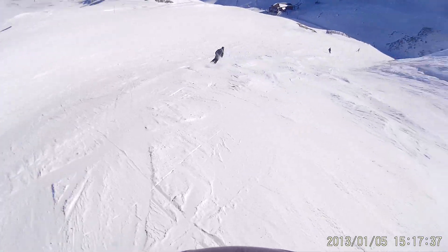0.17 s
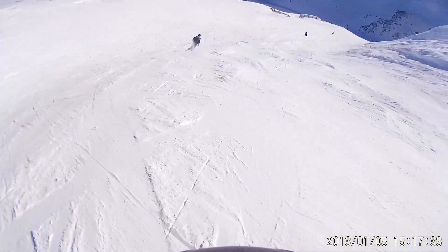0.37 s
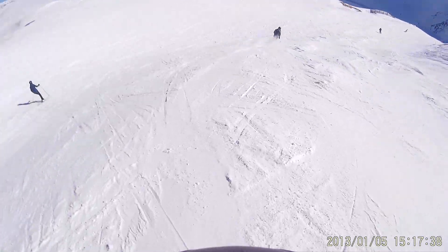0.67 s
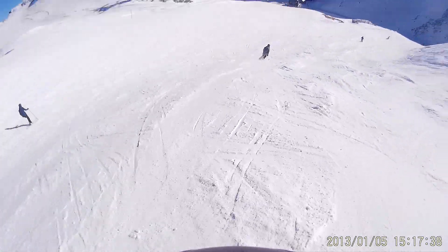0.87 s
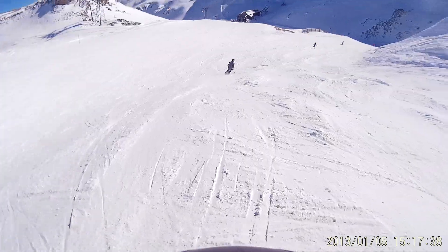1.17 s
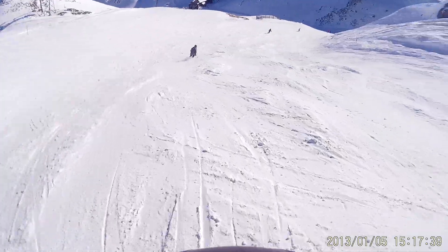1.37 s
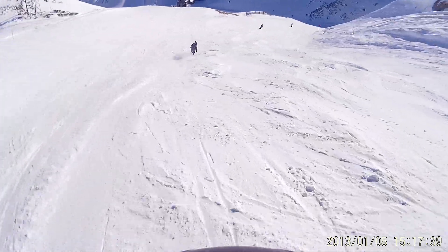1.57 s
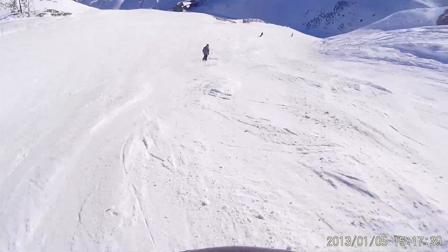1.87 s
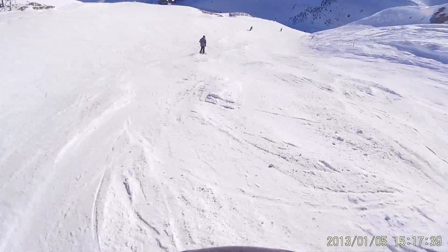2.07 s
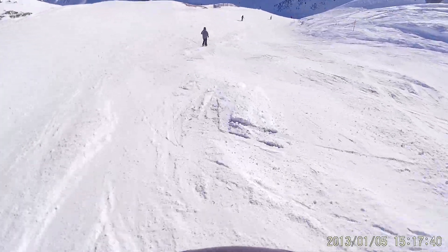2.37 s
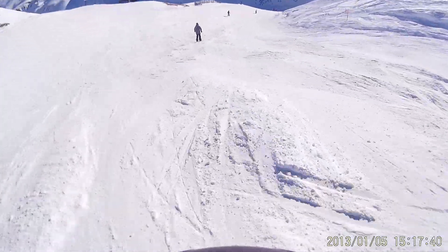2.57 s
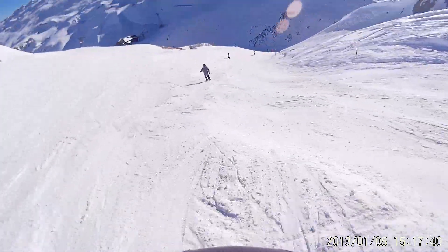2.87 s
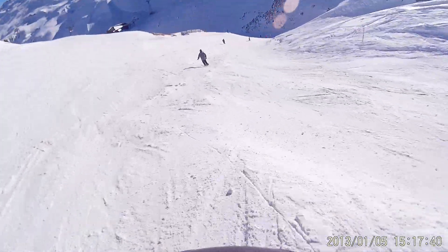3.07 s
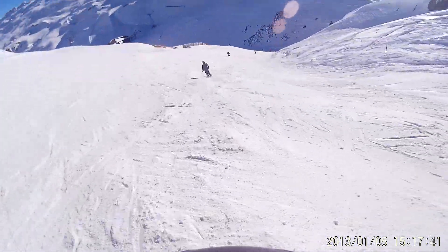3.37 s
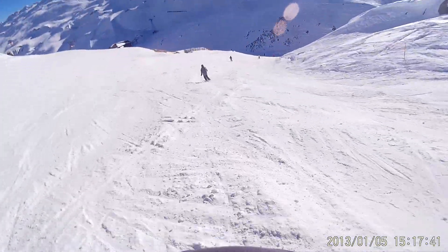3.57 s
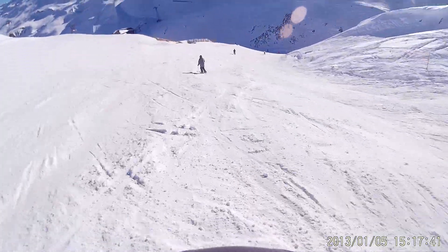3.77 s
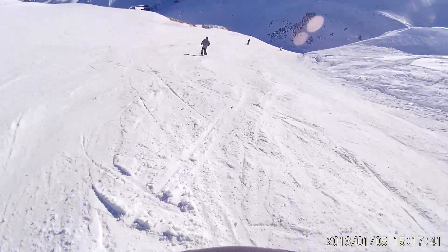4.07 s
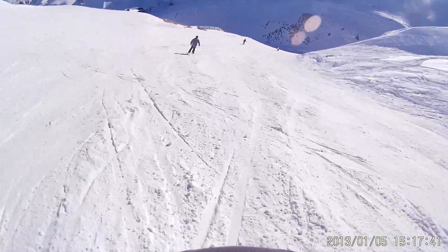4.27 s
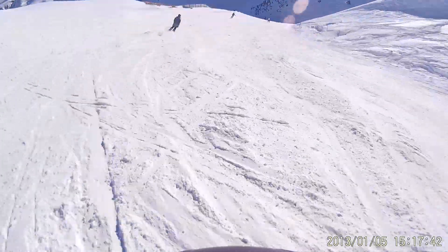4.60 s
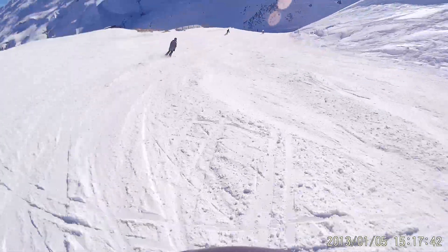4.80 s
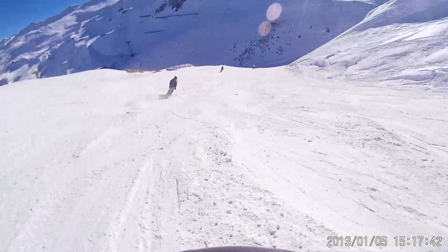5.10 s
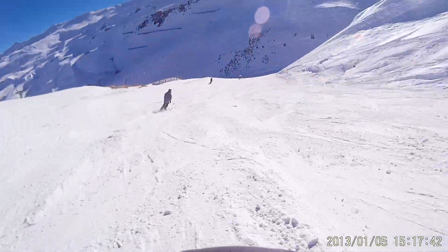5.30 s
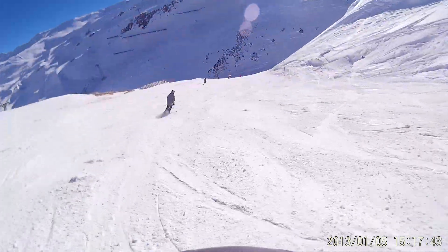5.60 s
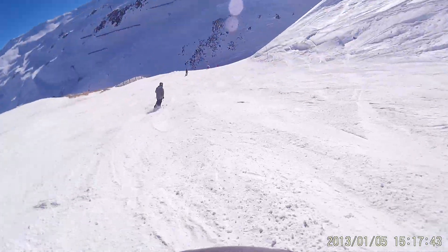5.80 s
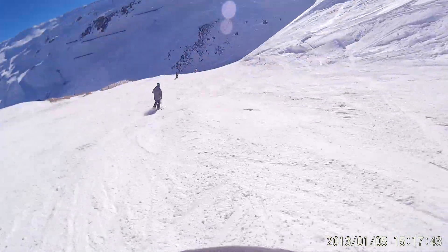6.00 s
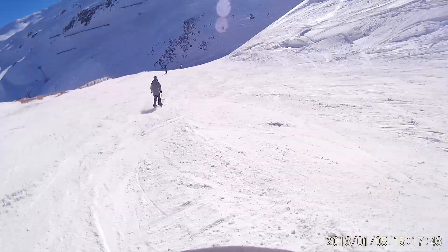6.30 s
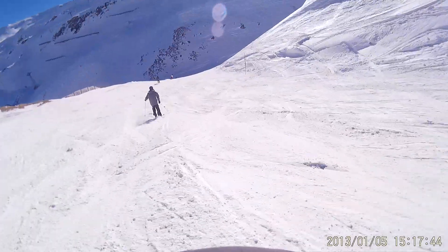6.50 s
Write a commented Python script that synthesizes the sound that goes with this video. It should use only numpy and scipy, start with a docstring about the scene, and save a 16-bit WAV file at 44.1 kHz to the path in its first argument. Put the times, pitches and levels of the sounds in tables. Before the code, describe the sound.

Soft puffs of wind and a few short rasps of ski edges on hard snow break a near-quiet hiss. As speed builds, the rush and scrape of the skis swell, easing briefly between turns, with low wind rumble underneath. Everything sounds boxy through the plastic case of a helmet microphone, which ticks and knocks more often and harder toward the end. The electronics add a barely audible pulsing whine.

```python
"""Faint hiss, soft gusts and a few gritty edge bites, then a growing rush as a skier speeds down a packed piste.
The microphone is a helmet camera in a closed plastic case, a body's height above the skis.
The bases rush over the snow and the edges scrape and spray in the turns; all of it rings the hollow case.
Wind buffets it, bumps make it tick on its mount, and the electronics whine faintly once a second."""
import sys
import numpy as np
from scipy import signal
from scipy.fft import rfft, irfft
from scipy.io import wavfile
from scipy.ndimage import uniform_filter1d

SR = 44100
rng = np.random.default_rng(int(sys.argv[2]) if len(sys.argv) > 2 else 0)


def pcm_store(signal):
    """Save signal as 16-bit PCM."""
    levels = np.round(np.clip(np.atleast_2d(signal), -1, 1) * 32767)
    wavfile.write(sys.argv[1], SR, levels.astype(np.int16).T)


N = 293265
TIME = np.arange(N) / SR


def undb(db):
    """Decibels to gain."""
    return 10 ** (np.asarray(db) / 20)


def unit(x):
    """Scale to rms 1."""
    return x / np.sqrt(np.mean(x ** 2))


def colour(x, points):
    """Filter by a spectrum of (Hz, dB) points, falling 10 dB an octave past its ends; rms 1."""
    hz, db = np.transpose(points)
    freqs = np.maximum(np.fft.rfftfreq(N, 1 / SR), 1)
    octaves_outside = np.maximum(np.log2(freqs / hz[-1]), 0) + np.maximum(np.log2(hz[0] / freqs), 0)
    curve_db = np.interp(np.log(freqs), np.log(hz), db) - 10 * octaves_outside
    return unit(irfft(rfft(x) * undb(curve_db), N))


def noise(points):
    """Steady noise with the given spectrum; rms 1."""
    return colour(rng.standard_normal(N), points)


def walk(rate):
    """A smooth random wander that turns about rate times a second; rms 1."""
    hold = int(SR / rate)
    steps = np.repeat(rng.standard_normal(N // hold + 1), hold)
    return unit(uniform_filter1d(steps, hold)[:N])


def bump(s, half_s):
    """A smooth rise and fall around a moment."""
    return np.exp(-((TIME - s) / half_s) ** 2)


# How hard the skis work the snow, growing with speed and easing between turns.
# Each row: time in seconds, effort in dB.
EFFORT = [(0.0, -66.5), (0.28, -66), (0.47, -71.2), (0.62, -66), (1.98, -59), (2.4, -51), (2.6, -44.5),
          (2.68, -50.5), (3.38, -40), (4.03, -39.5), (4.27, -34), (4.84, -35.5), (5.03, -40.5), (5.11, -35),
          (5.53, -29.9), (5.74, -30.5), (5.88, -38.5), (5.96, -33), (6.24, -29.5), (6.49, -35.5),
          (6.65, -34.5)]

def follow(cruise_db, slope):
    """Gain that is cruise_db at cruising effort and moves slope dB for each dB of effort."""
    above_cruise_db = np.interp(TIME, *np.transpose(EFFORT)) + 35
    return undb(cruise_db + slope * above_cruise_db)


# The faint background hiss briefly swells and dips early on.
# Each row: centre in seconds, half length in seconds, change in dB.
DRIFTS = [(.2, .12, 2.5), (.46, 0.069, -3), (.97, .06, 1), (1.146, 0.038, 5), (1.5, 0.28, -1.5),
          (1.79, 0.044, 4.5)]

def drift():
    """Gain of the background, which swells and dips while the skis are still quiet."""
    return undb(sum(db * bump(s, half_s) for s, half_s, db in DRIFTS))


def top_hiss():
    """Gain of a thin high hiss that rises from a faint floor as the overall sound gets louder."""
    return np.hypot(undb(-67) * drift(), follow(cruise_db=-60, slope=0.98))


# Pulsed tones, steady tones and fizz, inside the case with the microphone.
# Each row: frequency in Hz, relative level in dB.
PULSED_WHINE = [(8387, -19), (9087, -17), (9781, -17), (10481, -10), (10567, -13), (11181, -11),
                (14589, -17), (14675, -6), (15375, -14)]
STEADY_WHINE = [(9410, -22), (9483, -13), (9556, -14)]
FIZZ_COLOUR = [(8200, -14), (9300, -4), (10000, -8), (10550, 2), (11200, -4), (11900, -18), (14100, -18),
               (14700, -1), (15400, -6)]

def electronics(first_s=0.13, length_s=0.2, flutter_db=2.0, steady_db=-3.0, fizz_db=-7):
    """Faint high tones ride the top hiss: a few steady, and a fizzing cluster once a second."""
    pulsed, steady = (sum(np.sqrt(2) * undb(db) * np.sin(2 * np.pi * hz * TIME) for hz, db in tones)
                      for tones in (PULSED_WHINE, STEADY_WHINE))
    gate = uniform_filter1d(((TIME - first_s) % 1 < length_s) * 1., size=700)
    cluster = pulsed + undb(fizz_db) * noise(FIZZ_COLOUR)
    flutter = undb(flutter_db * walk(24))
    return top_hiss() * flutter * (gate * cluster + undb(steady_db) * steady)


# Wind right at the microphone. Each row: frequency in Hz, relative level in dB.
BUFFET_COLOUR = [(25, 2.5), (45, -5.5), (68, 6), (95, -11), (130, -19), (400, -68)]
SWELL_COLOUR = [(3, 0.5), (8, -3.5), (18, -3), (30, -19), (50, -20.5), (120, -51)]
BOOM_COLOUR = [(70, -8.5), (110, -4.5), (140, 3.5), (165, -1), (210, -5.5), (400, -15), (1000, -32)]
AIR_COLOUR = [(100, 5), (200, 1), (400, -3.5), (800, -9.5), (1200, -10), (3000, -36)]
# Gusts and bumps press air on the case.
# Each row: centre in seconds, half length in seconds, buffeting in dB, pressure swell in dB.
GUSTS = [(.15, .15, -70, -45), (0.623, 0.12, -53, -48.5), (0.923, 0.065, -41.5, -49),
         (1.122, .045, -46, -39), (1.818, 0.16, -55.5, -43.5), (2.258, .06, -51.5, -48),
         (3.22, 0.096, -65, -41), (4.05, .05, -46, -48), (4.587, 0.073, -58, -27), (5.48, .04, -46, -31),
         (5.732, 0.039, -44, -21.5), (6.232, 0.079, -38.5, -20.5)]

def wind(gust_boom_db=-11, eddy_db=1.0, waver_db=0.5):
    """Eddies buffet the case over pressure swells and moving air; the helmet booms; all grow with speed."""
    gust_buffet = sum(undb(db) * bump(s, half_s) for s, half_s, db, _ in GUSTS)
    gust_swell = sum(undb(db) * bump(s, half_s) for s, half_s, _, db in GUSTS)
    eddies = undb(eddy_db * walk(9))
    buffet = noise(BUFFET_COLOUR) * np.hypot(follow(-50, 0.45) * eddies, gust_buffet)
    swell = noise(SWELL_COLOUR) * np.hypot(follow(-39.5, 0.48) * eddies, gust_swell)
    boom = noise(BOOM_COLOUR) * np.hypot(follow(-47.5, 0.71), gust_buffet * undb(gust_boom_db))
    air = noise(AIR_COLOUR) * follow(-57.5, 0.23) * drift() * undb(waver_db * walk(6))
    return buffet + swell + boom + air


# Modes of the case around the microphone, in four groups from low to high: clack, crack, ring, snap.
# Each row of a group: frequency in Hz, width in Hz, relative level in dB.
CASE_MODES = [
    [(1494, 136, 2.5), (1677, 160, 2)],
    [(616, 85, -3), (1010, 130, -9.5), (2370, 236, 0.5), (2866, 143, -3.5)],
    [(3470, 100, -1), (4130, 180, -9), (5120, 160, -10.5)],
    [(5500, 340, 8), (7340, 190, 1), (9550, 3300, 11), (10700, 470, -2.5), (14500, 2000, -6)],
]

def case_ring(group, size=1024):
    """One group of case modes decays freely, with the energy of 8 ms at rms 1."""
    t = np.arange(size) / SR
    wave = sum((-1) ** k * undb(db) * np.exp(-np.pi * width_hz * t) * np.sin(2 * np.pi * hz * t)
               for k, (hz, width_hz, db) in enumerate(CASE_MODES[group]))
    return wave / np.sqrt(np.sum(wave ** 2) / (.008 * SR))


def strike(s, levels_db, contact_s, size=1024, grit=0.39):
    """One blow grinds on the case while contact lasts and rings each mode group at its own level."""
    out = np.zeros(N + size)
    age = np.arange(size) / SR / contact_s
    push = grit * rng.standard_normal(size) * age * np.exp(-age ** 2)
    push[0] += 1  # the impact itself
    start = int(s * SR)
    for group, db in enumerate(levels_db):
        wave = case_ring(group)
        struck = signal.fftconvolve(push, wave)[:size]
        out[start:start + size] += undb(db) * struck * wave.std() / struck.std()
    return out[:N]


def spray_gain():
    """The snow spray grows with the effort."""
    return follow(cruise_db=-47.5, slope=1.12)


def chatter(per_second=9, relative_db=-5.0, spread_db=3):
    """Faint stray ticks ring the case, mostly buried in the spray and growing with it."""
    hits = rng.random(N) < per_second / SR
    taps = hits * spray_gain() * undb(relative_db + spread_db * rng.uniform(-1, 1, N))
    return signal.fftconvolve(taps, case_ring(1) + case_ring(2))[:N]


# The case clacks on its mount, and hard jolts grind it there, centimetres from the microphone.
# Each row: start in seconds, base level in dB.
CLACKS = [(3.2061, -26.5), (3.7809, -27.5), (4.0131, -27.5), (5.0775, -26.5), (5.954, -31), (6.0895, -30.5),
          (6.2741, -26), (6.3696, -26.5), (6.478, -33.5), (6.5686, -33)]
JOLTS = [(5.7091, -23), (5.9383, -34), (6.1969, -20.5), (6.581, -36.5)]
# Light ticks, like chips of ice on the case.
# Each row: start in seconds, base level in dB, treble tilt in dB per mode group.
CHIPS = [(1.3758, -65, -8), (1.461, -63, -9), (2.3494, -61.5, -5), (2.596, -49, -1), (3.079, -43.5, 0.5),
         (3.398, -51, -1.5), (4.541, -46, 7.5), (4.61, -31, 0), (5.4576, -37, -1), (6.335, -39, -1)]

def ticks(notch_hz=6500, notch_width_hz=560):
    """Hollow clacks, harder jolts and bright chips all ring the same case, which blocks one high band."""
    # dB that each kind of blow adds to the four mode groups
    clack_db = np.array([0, -12, -10, -24.5])
    jolt_db = np.array([-1.5, 1, -9, -31])
    chip_db = np.array([-7, 1.5, -3, -11])
    above_crack = np.arange(len(CASE_MODES)) - 1
    clacks = sum(strike(s, db + clack_db, contact_s=0.00047) for s, db in CLACKS)
    jolts = sum(strike(s, db + jolt_db, contact_s=0.0016) for s, db in JOLTS)
    chips = sum(strike(s, db + chip_db + tilt * above_crack, contact_s=0.00062) for s, db, tilt in CHIPS)
    notch = signal.iirnotch(notch_hz, notch_hz / notch_width_hz, fs=SR)
    return signal.lfilter(*notch, clacks + jolts + chips)


def crunch(per_second, spread_db):
    """Countless snow grains break in dense clicks of uneven size; rms 1."""
    size = undb(spread_db * np.minimum(rng.exponential(size=N), 5))
    return unit(rng.standard_normal(N) * size * (rng.random(N) < per_second / SR))


# The edges catch underfoot in the first turns. Each row: centre in seconds, level in dB,
# half length in seconds, rush of the bases in dB against the bite.
BITES = [(0.606, -60.5, 0.048, 1), (0.727, -62, 0.092, -16), (0.883, -52.5, 0.044, -21),
         (0.938, -51, .007, -16), (0.976, -49, 0.056, -11.5), (1.128, -54, 0.083, -7.5),
         (2.087, -53, .004, -12)]

def grip():
    """How hard an edge is biting, as a gain."""
    return sum(undb(db) * bump(s, half_s) for s, db, half_s, _ in BITES)


# A bite as heard from the helmet. Each row: frequency in Hz, relative level in dB.
BITE_COLOUR = [(900, -27), (1150, -15), (1400, -10), (1600, 0), (1750, -6), (2050, -28), (2700, -17),
               (3100, -25), (3550, -20), (4300, -34)]

def edge_bites():
    """A steel edge catches on hard snow in short, gritty rasps."""
    return grip() * colour(crunch(per_second=6500, spread_db=1.8), BITE_COLOUR)


# Skis on snow, a body's height below the microphone and heard through the case, plus a thin high hiss.
# Each row: frequency in Hz, relative level in dB.
RUSH_COLOUR = [(150, -36), (230, -14), (290, -10), (375, -1.5), (480, -6), (570, 1.5), (660, 2.5),
               (720, -3), (810, -10), (950, -12), (1300, -12.5), (2200, -55)]
SCRAPE_COLOUR = [(500, -8), (900, -16.5), (1100, -10), (1300, -8), (1470, 1), (1610, 0.5), (1750, -6),
                 (1900, -10), (2080, -16.5), (3000, -32)]
SPRAY_COLOUR = [(1500, -17), (2100, -8), (2350, -5), (2850, -4), (3150, -8.5), (3520, -0.5), (4100, -3.5),
                (4750, -14), (5200, -15), (5750, -21.5), (6450, -35), (7350, -18), (9000, -31)]
HISS_COLOUR = [(1500, 5.5), (5000, 2), (6500, 2), (7400, 2), (8200, 2), (9100, 6), (9500, 7), (9900, 2),
               (10550, 9.5), (11500, 1), (13800, 2), (14650, 5.5), (15800, -0.5)]
# Tilting onto the edges trades rush for scrape and spray. Each row: time in seconds, edging in dB.
EDGING = [(0.0, 3.5), (1.4, 3), (1.9, -1), (2.35, -1.5), (2.6, -1), (3.3, 0), (4.0, 0.5), (4.38, 1.5),
          (4.9, 1), (5.25, -.5), (5.6, 1), (5.9, -0.5), (6.25, -0.1), (6.65, -1.5)]

def skis(rut_db=.8, patch_db=0.34, rush_loss=0.63, flicker_db=0.7,
         bite_scrape_db=-4.5, bite_spray_db=-19.5):
    """Bases rush, edges scrape and spray hisses; ruts and patches in the piste shake them all together."""
    ruts = undb(rut_db * walk(35) + patch_db * walk(9))
    edging_db = np.interp(TIME, *np.transpose(EDGING))
    bite = grip()
    bite_rush = sum(undb(db + rush_db) * bump(s, half_s) for s, db, half_s, rush_db in BITES)
    rush_level = np.hypot(follow(-38, 1.053) * undb(-rush_loss * edging_db), bite_rush)
    scrape_level = np.hypot(follow(-38, 1.086) * undb(edging_db), bite * undb(bite_scrape_db))
    spray_level = np.hypot(spray_gain() * undb(edging_db), bite * undb(bite_spray_db))
    rush = rush_level * noise(RUSH_COLOUR)
    scrape = scrape_level * colour(crunch(per_second=9000, spread_db=-0.5), SCRAPE_COLOUR)
    spray = spray_level * colour(crunch(per_second=14000, spread_db=0.5), SPRAY_COLOUR)
    hiss = top_hiss() * noise(HISS_COLOUR) * undb(flicker_db * walk(150))
    return ruts * (rush + scrape + spray + hiss)


def scene():
    """Everything meets at the one microphone on the helmet."""
    return (skis() + edge_bites() + wind() + ticks() + chatter() + electronics())[None]


def record(dry):
    """The camera cuts the treble steeply above 15850 Hz."""
    return signal.sosfilt(signal.ellip(10, .2, 70, 15850, fs=SR, output="sos"), dry)


dry = scene()
out = record(dry)
pcm_store(out)
```